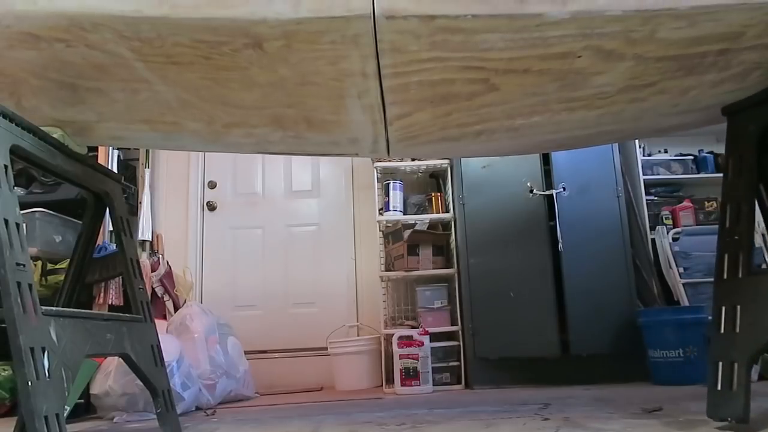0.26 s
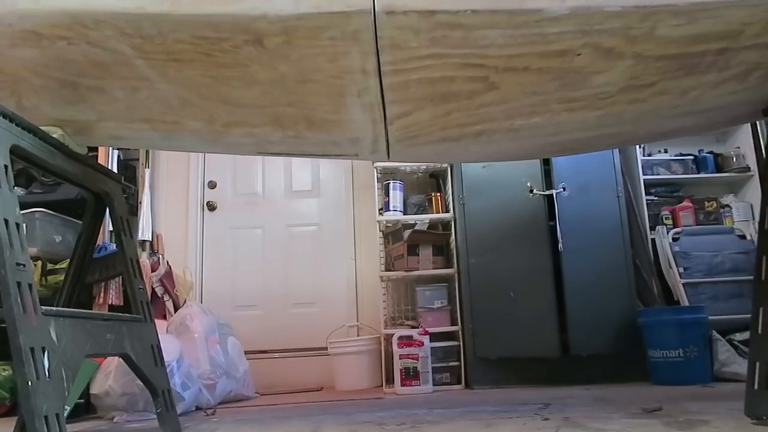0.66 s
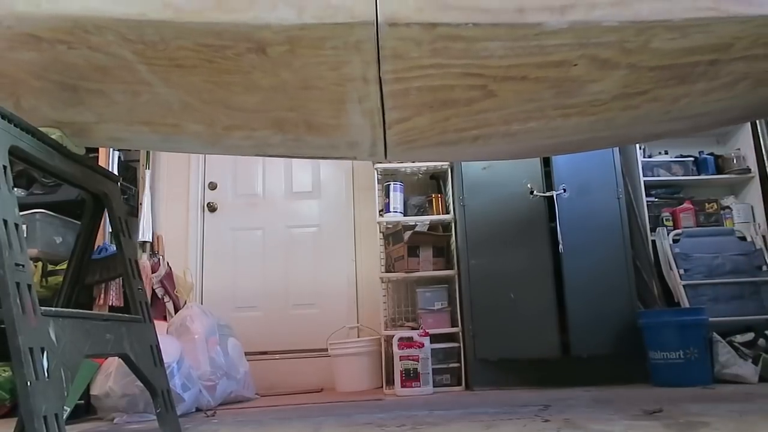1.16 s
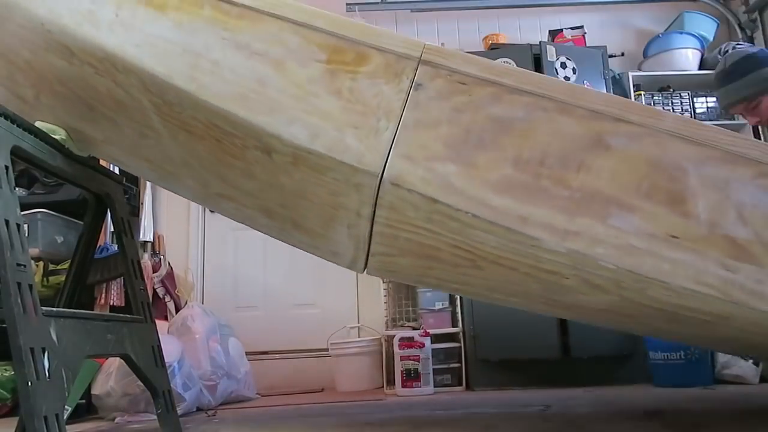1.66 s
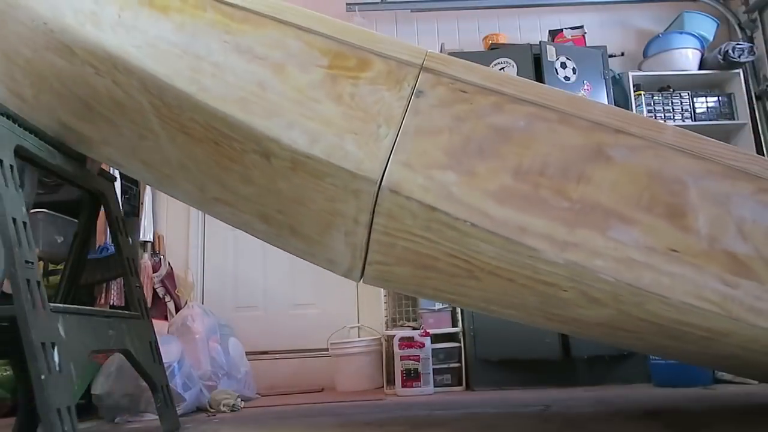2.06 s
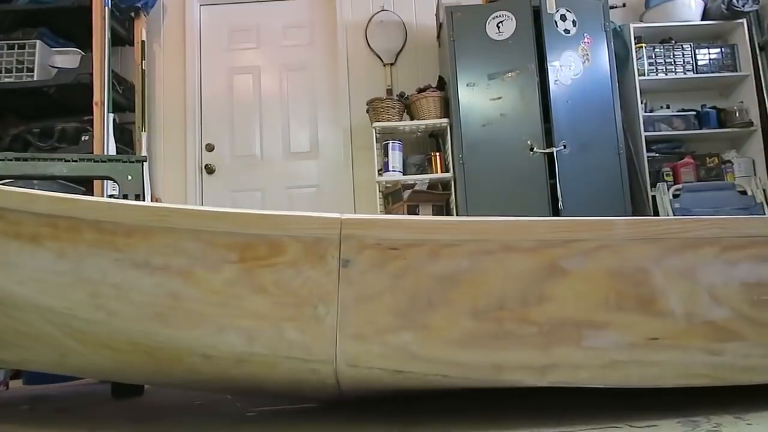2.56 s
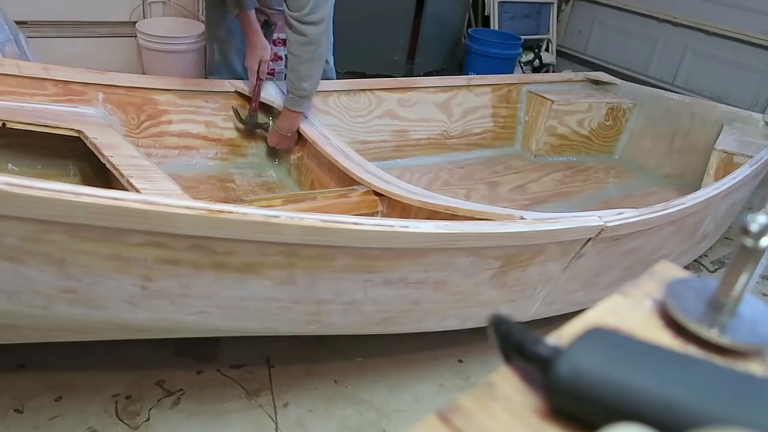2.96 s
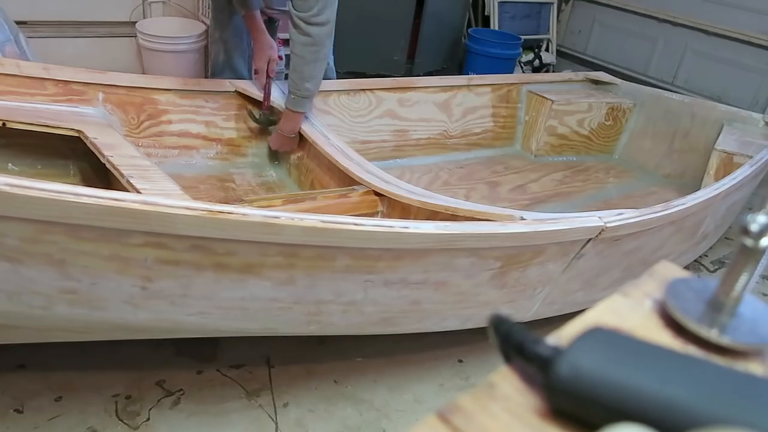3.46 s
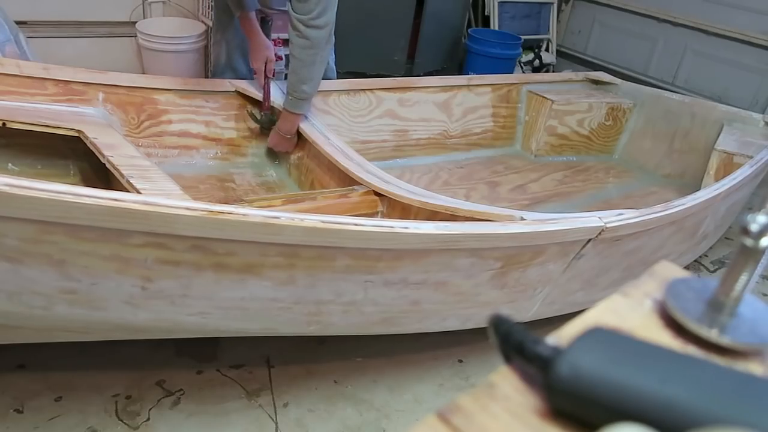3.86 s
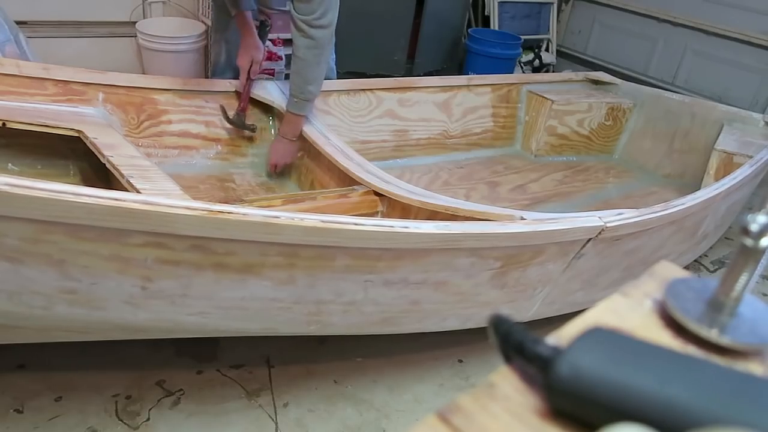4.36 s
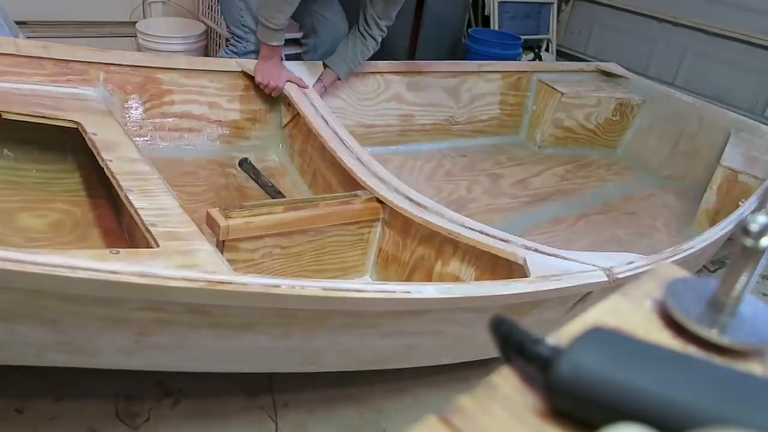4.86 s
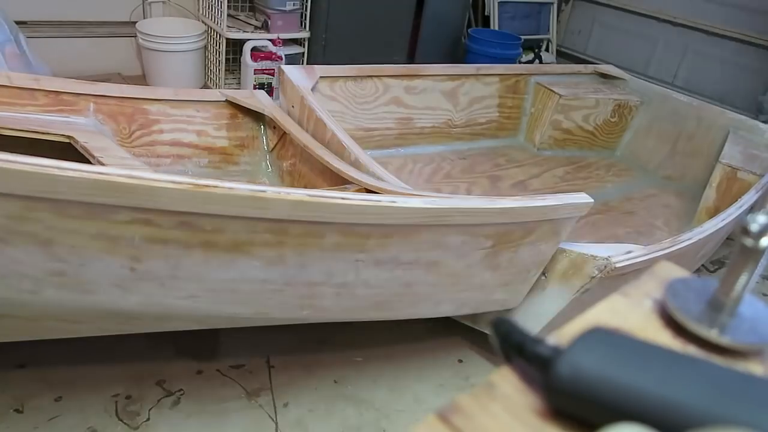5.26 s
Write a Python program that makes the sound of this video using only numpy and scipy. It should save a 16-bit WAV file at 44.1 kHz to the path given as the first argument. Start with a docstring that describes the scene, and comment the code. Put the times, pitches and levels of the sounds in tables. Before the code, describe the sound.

Wooden hull clatters on trestles in a garage, faint hurried bumps follow, then loud hammer blows on a steel punch, rattles and faded scuffs.

```python
"""Boat hull in a garage workshop

A plywood hull and its trestles clatter; hurried, faded snatches of it being carried and set down follow.
A hammer drives a steel punch into the hull, the punch rattles, and more snatches follow.
Wood is shaped noise plus damped panel modes, steel is high damped modes; the garage rings on as dying noise.
Shuffling and rumble lie beneath. The sound is cut dead twice and fades in again; the camera clips loud blows."""
import sys
import numpy as np
from scipy import signal
from scipy.fft import rfft, irfft, next_fast_len
from scipy.io import wavfile

SR = 44100
rng = np.random.default_rng(int(sys.argv[2]) if len(sys.argv) > 2 else 0)


def dump(signal):
    """Clip the signal to [-1, 1] and save it as 16-bit WAV at the path in sys.argv[1]."""
    limited = np.clip(np.atleast_2d(signal).T, -1, 1)
    pcm = np.round(limited * 32767).astype(np.int16)
    wavfile.write(sys.argv[1], SR, pcm)


N = 243413

# hammer blows and rebounds: t/s, level/dB, boom re level/dB, treble re level/dB, floor thud/dB,
# panel note f/Hz, its lift/dB, higher note f/Hz, its lift/dB, decay factor, attack/s, steel crack/dB, punch ring/dB
HAMMER_BLOWS = [(2.937, -12, -2, -17, -36, 219.3, 21, 703, 13.5, 0.68, 0.0014, -39, -42),
                (3.146, -17.5, 1.5, -10, -37.5, 421.6, 12, 1920, 7, 0.92, .002, -45.5, -36),
                (3.353, -17, -2.5, -8.5, -33, 382.6, 6, 1300, 5, 0.93, 0.0045, -47.5, -28.5),
                (3.563, -17.5, -5.5, -7.5, -53, 424, 11, 2610, 15, 0.89, 0.0023, -41.5, -19),
                (3.798, -37.5, -18, 6, -60, 381, 5.5, 3190, 7, 0.56, 0.0032, -56.5, -30.5),
                (3.811, -17.5, 4, -25.5, -71, 210, 11, 523, 11, 0.8, 0.0025, -94, -42),
                (3.843, -28.5, 11.5, -28, -43, 390.4, 15.5, 1110, 13, 1, 0.0056, -110, -70),
                (4.585, -22, 11.5, -28, -57, 215, 7.5, 402, 12, 0.67, 0.0032, -79, -70),
                (4.615, -27, 10.5, -40.5, -39, 380, 15.5, 1077, 14, 0.97, 0.0032, -110, -80)]
# contact kind: knock lift/dB, bright lift/dB, lower-note lift/dB, panel note : lower note frequency ratio
HAMMER_KIND = (-0.5, 4, 5.5, 1.84)
# notes every blow wakes in the hull bottom: f/Hz, lift/dB, f/Hz, lift/dB
BILGE_NOTES = [100, 7.8, 385, 5.6]
# steel punch modes: f/Hz, level/dB, base t60/s
PUNCH_MODES = [(4613, -3, .3), (6753, -17, .4), (10100, -7, .24), (11852, -17, .22)]
CRACK_T60_S = 0.023
CRACK_LEAD = 0.44  # crack is slightly early at one port: share of its slope per sample


def hammer_blows():
    """Hull struck through the punch: wood hit, crack of steel on steel, ringing punch."""
    out = np.zeros((2, N))
    crack_spectrum = [(3000, -11.5), (10000, -9.5), (14500, -15.5), (16000, -47.0)]
    for start_s, *row, decay, attack_s, crack_db, punch_db in HAMMER_BLOWS:
        levels, notes = contact(HAMMER_KIND, *row)
        t, wood = hit(levels, decay, [*notes, *BILGE_NOTES], direct_db=-1.0, attack_s=attack_s)
        crack_noise = hiss(len(t), crack_spectrum).mean(axis=0)
        crack = amp(crack_db - 60 * t / CRACK_T60_S) * crack_noise
        port_shift = np.outer([1, -1], CRACK_LEAD * np.gradient(crack))
        punch = amp(punch_db) * ring(PUNCH_MODES, t, rough=0.75, rate_hz=180)
        add(out, start_s, wood + crack + port_shift + punch)
    return out


# punch rattles: t/s, level/dB, punch ring/dB, extra on lowest mode/dB
PUNCH_RATTLES = [(4.028, -36.5, -44, -4), (4.108, -40, -37.5, -8.5), (4.154, -39.5, -46.5, 12),
                 (4.21, -39, -41.5, -3), (4.273, -47, -44.5, 0), (4.306, -39.5, -62, 4),
                 (4.339, -48, -54, 9), (4.388, -36, -44, 2), (4.44, -40.5, -45.5, -6)]
# contact kind: knock lift/dB, bright lift/dB, lower-note lift/dB, panel note : lower note frequency ratio
TAP_KIND = (-0.5, 1.5, 6.5, 3)
TAP_BOOM_DB, TAP_TREBLE_DB, TAP_THUD_DB = -14, -11.5, -42  # re level
TAP_NOTE_HZ, TAP_NOTE_LIFT_DB = 900, 17.5  # note: median of a random spread


def punch_rattles():
    """Punch rattling on the wood: soft taps plus steel modes tilted to the low end."""
    out = np.zeros((2, N))
    light = [(hz, db + 6 - 3 * np.log2(hz / 4600), t60_s) for hz, db, t60_s in PUNCH_MODES]
    for start_s, level_db, punch_db, low_db in PUNCH_RATTLES:
        note_hz = TAP_NOTE_HZ * np.exp(rng.normal(0, 0.13))
        thud_db = level_db + TAP_THUD_DB
        levels, notes = contact(TAP_KIND, level_db, TAP_BOOM_DB, TAP_TREBLE_DB, thud_db,
                                note_hz, TAP_NOTE_LIFT_DB)
        t, wood = hit(levels, 1, notes, direct_db=-8, attack_s=0.0066)
        modes = [np.add(light[0], [0, low_db, 0]), *light[1:]]
        steel = amp(punch_db) * ring(modes, t, decay=0.8, rough=0.53, rate_hz=70)
        onset = 1 - np.exp(-t / 0.0087)
        add(out, start_s, wood + steel * onset)
    return out


# trestle knocks: t/s, level/dB, boom re level/dB, treble re level/dB, floor thud/dB,
# panel note f/Hz, its lift/dB, higher note f/Hz, its lift/dB
TRESTLE_KNOCKS = [(0, -30.5, -4, -32, -40, 785, 20, 1940, 13),
                  (0.049, -11.5, -10, -27, -35, 737, 18, 1560, 15.5),
                  (0.085, -29, 2, -32, -43, 736, -2, 3000, 7),
                  (0.185, -24.5, 1.5, -24.5, -53, 532, 14, 2600, 1),
                  (0.249, -49.5, 21, -11.5, -18, 196, 14, 1090, 6),
                  (0.464, -17.5, -2.5, -17, -38, 802, 7, 2790, 3.5),
                  (0.505, -19, -10.5, -15.5, -42, 1530, 10, 3010, 12),
                  (0.537, -18.5, -25, -19, -34.5, 700, 18, 3000, 14),
                  (0.579, -30, -30, -19.5, -52, 1340, 17, 2850, 14),
                  (0.705, -22.5, -13, -39.5, -60, 650, 10, 1780, 13.5),
                  (0.752, -14.5, -25, -31.5, -43, 653, 8, 2700, 19.5),
                  (0.764, -14.5, -26.5, -24.5, -61, 1260, 15.5, 2020, 15),
                  (0.8, -24.5, -40, -33, -61, 1300, 23.5, 2015, 12.5),
                  (0.882, -25.5, -15.5, -26, -39, 1294, 16, 1990, 18),
                  (0.904, -25.5, -47, -30.5, -67, 1350, 7, 2010, 13)]
# contact kind: knock lift/dB, bright lift/dB, lower-note lift/dB, panel note : lower note frequency ratio
TRESTLE_KIND = (1, 8.86, 3.6, 2.1)
TRESTLE_DECAY = 0.94  # share of base t60


def trestle_knocks():
    """Hull and trestles clattering: sharp wood hits."""
    out = np.zeros((2, N))
    for start_s, *row in TRESTLE_KNOCKS:
        levels, notes = contact(TRESTLE_KIND, *row)
        _, wood = hit(levels, TRESTLE_DECAY, notes, direct_db=-1.0, attack_s=0.0014)
        add(out, start_s, wood)
    return out


# bumps and scuffs: centre t/s, level/dB, boom re level/dB, treble re level/dB, floor thud/dB,
# panel note f/Hz, its lift/dB
HANDLING = [(1.269, -32, -5, -20.5, -33, 251, 6), (1.306, -38, -4, -27, -31, 1070, 11),
            (1.337, -29, -2, -24.5, -51, 1082, 12), (1.376, -38.5, -6, -23.5, -48, 1080, 12),
            (1.42, -40, 3, -18.5, -45, 534, 10), (1.502, -64, -7, -2.5, -34, 433, 8),
            (1.533, -52, 7, -11, -72, 204, 9), (1.633, -50.5, 4, -10, -45, 198, -1),
            (1.696, -49, -6, -13, -52, 557, 28), (1.726, -55.5, 13.5, -25.5, -54, 410, 8),
            (1.835, -68, 14, -28.5, -35, 170, 12), (1.88, -51, -6, -16, -50, 515, 14),
            (1.94, -56.5, -2, -3.5, -37, 600, 7), (2.038, -37, -15, -1, -45, 1510, 13),
            (2.104, -51, 9.5, -27, -46, 240, 14.5), (2.155, -42, -18, -17.5, -61, 3020, 11),
            (2.209, -37.5, 1, -12, -29.5, 2790, 9), (2.278, -34.5, 6, -16, -29, 176.5, 9.5),
            (2.367, -46, 5, -1, -31.5, 153, 8), (2.481, -45, -7, -8.5, -51, 191, 8),
            (2.555, -33.5, 6, -23, -42, 813, 13.5), (2.66, -30, -20, -11, -45, 360, 3),
            (2.695, -37.5, 6.5, -18, -40.5, 2000, 20), (2.746, -53, 6.5, -18, -49, 394, -3),
            (2.891, -46, 4.5, -16, -45, 717, 4.5), (4.845, -61, -16.5, -24, -69, 1560, 8),
            (4.915, -38, 8, -28, -46, 401, 4.5), (4.998, -34, -1.5, -25, -26.5, 270, 11),
            (5.04, -38, 0, -23, -61, 278, 12), (5.126, -57, 1, 14, -59, 3800, 4),
            (5.216, -49, -16, -20, -68, 2280, 13), (5.281, -40, 10.5, -19.5, -49, 631, 20),
            (5.35, -52, -5, -5.5, -54, 620, 14), (5.42, -54, -17, -11.5, -60, 1400, 8),
            (5.459, -47.5, 1, 1, -56, 530, 16), (5.517, -29.5, -5.5, -19.5, -61, 1530, 19)]
# contact kind: knock lift/dB, bright lift/dB, lower-note lift/dB, panel note : lower note frequency ratio
SCUFF_KIND = (0.67, 1.17, 2.1, 3)
SWELL_S, WIDER_DB = 0.0175, 0.042  # bell width at 0 dB treble; dB wider per dB duller


def snatches():
    """Hull carried and set down: noise and panel modes swell in and out, no attack or tail."""
    out = np.zeros((2, N))
    for centre_s, *row in HANDLING:
        levels, notes = contact(SCUFF_KIND, *row)
        spectrum = colour(*levels)
        treble_db = row[2]
        t, swell = swelling(SWELL_S * amp(-WIDER_DB * treble_db))
        tones = ring(panels(spectrum, notes), t, decay=8.5, rough=0.65, rate_hz=43)
        bump = amp(5.5) * tones * swell ** 1.8
        flicker = amp(2.24 * wobble(1, t, 119.3) - 0.5)
        scuff = flicker * hiss(len(t), spectrum, ripple_db=2)
        add(out, centre_s - t[-1] / 2, (scuff + bump) * swell)
    return out


# punch jingles: centre t/s, ring level/dB
PUNCH_JINGLES = [(4.915, -54.5), (5.126, -41), (5.27, -42), (5.3, -43.5), (5.419, -45.5), (5.457, -34)]


def punch_jingles():
    """Punch ringing in the last snatches: modes 1.6 % sharp, decay x5, under a bell-shaped fade."""
    out = np.zeros((2, N))
    t, swell = swelling(SWELL_S)
    modes = np.multiply(PUNCH_MODES, [1.016, 1, 5])
    for centre_s, db in PUNCH_JINGLES:
        steel = amp(db) * ring(modes, t, rough=0.85, rate_hz=110)
        add(out, centre_s - t[-1] / 2, steel * swell)
    return out


# workshop background: t/s, shuffle level/dB, rumble level/dB
BACKGROUND = [(0.0, -49.5, -59), (0.11, -48, -74), (0.29, -77, -60.5), (0.6, -67.5, -73), (0.75, -59, -70),
              (1.0, -76, -98), (1.201, -72.5, -63.5), (1.6, -73, -87.5), (1.95, -71, -83), (2.18, -72, -63),
              (2.43, -82.5, -70), (2.69, -74, -92), (2.799, -75, -81), (3.09, -65.5, -55.5),
              (3.29, -84, -66), (3.41, -56, -80.5), (3.55, -94, -79), (3.64, -61, -88), (3.84, -93, -82.5),
              (3.98, -70, -71), (4.231, -98, -110), (4.41, -75.5, -104), (4.75, -90, -83), (5.1, -73, -93),
              (5.52, -71, -86)]
# shuffle spectrum: f/Hz, relative density/dB per Hz
SHUFFLE_SPECTRUM = [(88, -22), (150, 0), (311, -6.5), (427, -3), (805, -3.5), (1970, -13), (10400, -40.5),
                    (11800, -44.5), (13000, -71)]


def air():
    """Shuffling and low rumble between events: two shaped noises with drifting levels."""
    knot_s, shuffle_db, rumble_db = np.transpose(BACKGROUND)
    t = np.arange(N) / SR
    rumble_spectrum = [(25, -26.5), (60, -9.0), (150, 0.0), (260, 0), (400, -120)]
    shuffle = amp(np.interp(t, knot_s, shuffle_db)) * hiss(N, SHUFFLE_SPECTRUM)
    rumble = amp(np.interp(t, knot_s, rumble_db)) * hiss(N, rumble_spectrum)
    return shuffle + rumble


# garage reverberation: f/Hz, base t60/s
GARAGE_T60 = [(60, 1), (160, 0.65), (420, 0.54), (1100, 0.42), (2900, 0.45), (7700, 0.38), (14000, 0.22)]
# floor boom under a heavy hit: f/Hz, level/dB, base t60/s
FLOOR_BOOM = [(62.6, -8, 0.3)]


def hit(levels, decay, notes, direct_db, attack_s):
    """One hit on wood: short direct burst, lumpy garage answer, ringing panels, floor boom."""
    t = np.arange(int(0.6 * SR)) / SR
    spectrum = colour(*levels)
    room_t60 = [(hz, decay * t60_s) for hz, t60_s in GARAGE_T60]
    direct = amp(direct_db - 60 * t / 0.055) + amp(direct_db - 2.5 - 60 * t / 0.011)
    burst = hiss(len(t), spectrum, room_t60, ripple_db=4.5) * (1 + direct)
    lumps = amp(0.69 * wobble(1, t, 220))  # single echoes and bounces
    tones = ring(panels(spectrum, notes), t, decay, rough=0.71, rate_hz=90)
    boom = amp(levels[0] + 3) * ring(FLOOR_BOOM, t, decay, rough=0.21, rate_hz=5.1)
    early = 1 + amp(direct_db - 60 * t / 0.17)  # tones loudest before the room takes over
    body = amp(-3.5) * lumps * burst + amp(-3.0) * early * (tones + boom)
    return t, body * (1 - np.exp(-t / attack_s))


# plywood hull modes: f/Hz, base t60/s
HULL_MODES = [(135, .3), (165, .3), (205, .3), (240, .25), (270, .2), (340, .2), (382, .25), (420, .2),
              (520, .2), (590, .15), (650, .15), (725, .2), (810, .15), (950, .15), (1035, .2), (1085, .2),
              (1180, .2), (1270, .35), (1315, .4), (1560, .2), (1770, .25), (1850, .25), (1990, .35),
              (2300, .2), (2480, .2), (2620, .2), (2820, .33), (2930, .33), (3050, .33), (3250, .25),
              (3800, .2)]


def panels(spectrum, notes):
    """Hull modes near the favoured notes, standing out of the spectrum: (Hz, dB, s)."""
    hz, t60_s = np.transpose(HULL_MODES)
    lifts = [db - 8 * (np.log(hz / note_hz) / 0.07) ** 2 for note_hz, db in np.reshape(notes, (-1, 2))]
    near_db = np.max(lifts, axis=0)
    modes = np.transpose([hz, along(spectrum, hz) + near_db + 16, t60_s])
    return modes[near_db >= min(-12, near_db.max())]


def contact(kind, level_db, boom_db, treble_db, thud_db, note_hz, *notes):
    """Six register levels and panel notes of one contact; in-between registers halfway plus lift."""
    knock_db, bright_db, below_db, ratio = kind
    levels = [thud_db,
              level_db + boom_db,
              level_db + boom_db / 2 + knock_db,
              level_db,
              level_db + treble_db / 2 + bright_db,
              level_db + treble_db]
    return levels, [note_hz / ratio, below_db, note_hz, *notes]


def colour(thud_db, boom_db, knock_db, body_db, bright_db, treble_db):
    """Knocked-wood spectrum (Hz, dB per Hz) from six register levels."""
    return [(25, thud_db - 20.0), (75, thud_db - 20.5), (230, boom_db - 22.5),
            (650, knock_db - 27), (1500, body_db - 29.5), (3100, bright_db - 31.0),
            (4600, (bright_db + treble_db) / 2 - 33), (6500, treble_db - 34.5),
            (10500, treble_db - 44), (13000, treble_db - 66.0)]


def ring(modes, t, decay=1, rough=0.5, rate_hz=60):
    """Damped modes, phases differing by port; wall echoes spread the rough share into a narrow band."""
    hz, db, t60_s = np.transpose(modes)[..., None]
    port_phase = rng.normal(0, 0.29, (2, *hz.shape)) * np.sqrt(hz / 1000)
    phase = rng.uniform(0, 2 * np.pi, hz.shape) + port_phase
    spread = wobble(len(hz), t, rate_hz) + 1j * wobble(len(hz), t, rate_hz)
    flutter = np.sqrt(1 - rough) + np.sqrt(rough) * spread
    tones = np.imag(flutter * np.exp(1j * (2 * np.pi * hz * t + phase)))
    return np.sum(amp(db - 60 * t / (decay * t60_s)) * tones, axis=1)


# stereo likeness: f/Hz, left-right correlation (clipped to 0..1 after interpolation)
LIKENESS = [(60, 1.0), (180, 0.99), (550, 0.92), (1650, 0.95), (4970, 0.75), (15000, -1.47)]


def hiss(n, spectrum, t60=None, ripple_db=0):
    """Stereo shaped noise; t60 gives each frequency its own decay, ripple many small resonances."""
    pair = rng.standard_normal((2, n))
    if t60:
        hz, t, z = signal.stft(pair, SR, nperseg=256)
        fade = amp(-60 * t / along(t60, hz)[:, None])
        pair = signal.istft(z * fade, SR, nperseg=256)[1][:, :n]
    m = next_fast_len(n + 4096)
    hz = np.fft.rfftfreq(m, 1 / SR)
    ripple = ripple_db * np.tanh(wobble(1, hz / 1000, 16))  # 16 knots per kHz
    gain = amp(along(spectrum, hz) + ripple)
    turn = np.arccos(np.clip(along(LIKENESS, hz), 0, 1)) / 2
    mid_side_gain = [np.cos(turn), np.sin(turn)]
    mid, side = irfft(rfft(pair, m) * gain * mid_side_gain, m)[:, :n]
    return np.sqrt(SR / 2) * np.array([mid + side, mid - side])


def swelling(width_s):
    """Times and Gaussian fade of one snatch, 6 widths long."""
    t = np.arange(int(6 * width_s * SR)) / SR
    return t, np.exp(-0.5 * (t / width_s - 3) ** 2)


def wobble(count, t, rate):
    """Random curves over t, rate knots per unit of t."""
    knots = rng.standard_normal((count, int(t[-1] * rate) + 2))
    return np.array([np.interp(t * rate, np.arange(len(k)), k) for k in knots])


def along(points, hz):
    """Interpolates (Hz, value) points on a log axis."""
    f, v = np.transpose(points)
    return np.interp(np.log(hz + 1), np.log(f + 1), v)


def amp(db):
    """dB to gain."""
    return 10 ** (np.asarray(db) / 20)


def add(out, start_s, sound):
    """Mixes a sound in at start_s."""
    at = out[:, round(start_s * SR):][:, :sound.shape[1]]
    at += sound[:, :at.shape[1]]


# dead cuts: t/s, fade-in/s
DEAD_CUTS = [(1.148, 0.08), (4.783, 0.055)]


def scene():
    """All sources; each cut silences them, then fades in, and stops hits and their tails for 1 s."""
    t = np.arange(N) / SR
    struck = hammer_blows() + punch_rattles() + trestle_knocks()
    gain = np.ones(N)
    for cut_s, fade_s in DEAD_CUTS:
        struck = struck * ~((t > cut_s) & (t < cut_s + 1))
        fade_in = np.clip((t - cut_s) / fade_s, 0, 1) ** 3
        gain = gain * np.where(t < cut_s, 1, fade_in)
    return (struck + snatches() + punch_jingles() + air()) * gain


BASS_CUT_HZ, TOP_HZ = 54, 16300


def record(dry):
    """Microphone drops the deepest bass; camera clips loud blows smoothly and cuts above TOP_HZ."""
    m = next_fast_len(N + 8192)
    hz = np.fft.rfftfreq(m, 1 / SR)
    bass_cut = 1 / np.sqrt(1 + (BASS_CUT_HZ / (hz + 1)) ** 10)
    heard = irfft(rfft(dry, m) * bass_cut, m)
    clipped = heard / (1 + np.abs(heard) ** 8) ** (1 / 8)
    return irfft(rfft(clipped, m) * (hz < TOP_HZ), m)[:, :N]


dry = scene()
out = record(dry)
dump(out)
```